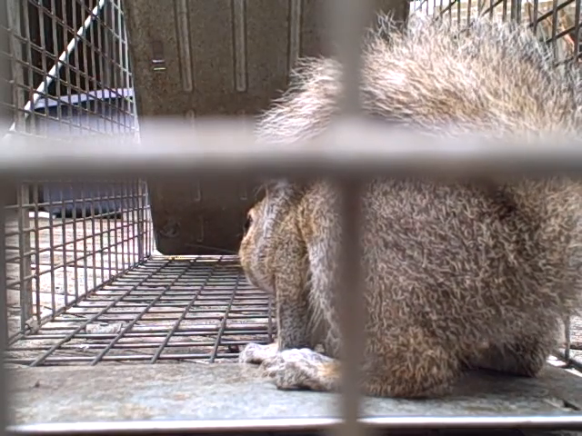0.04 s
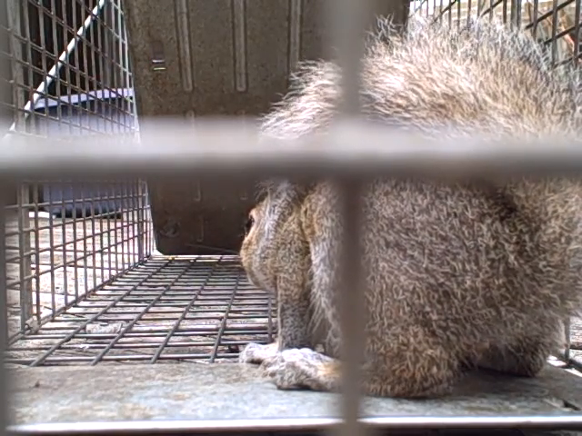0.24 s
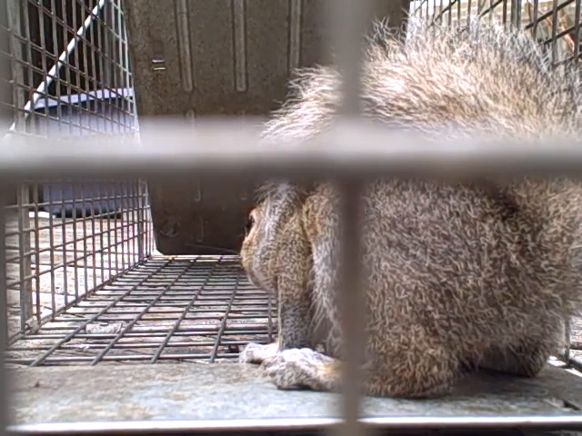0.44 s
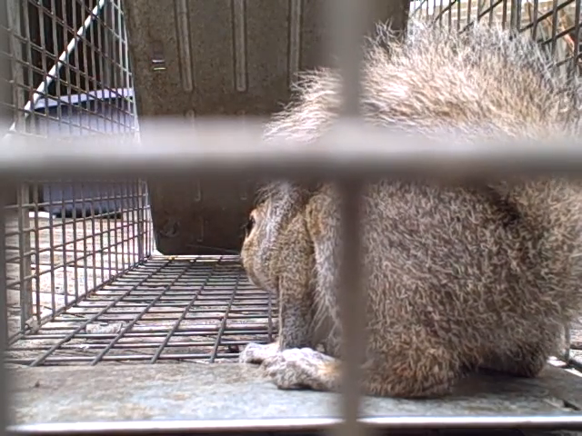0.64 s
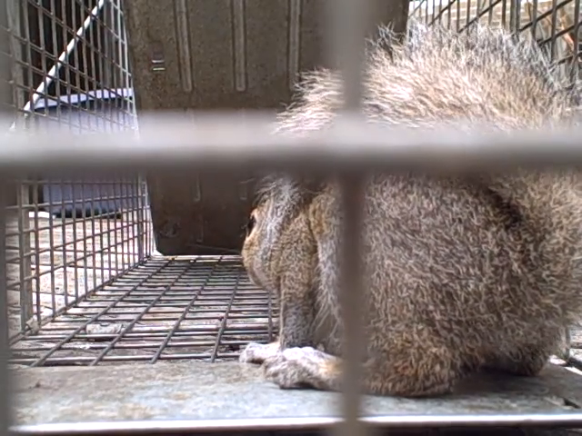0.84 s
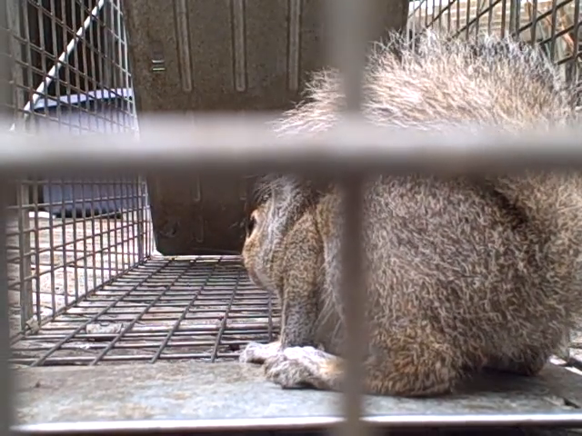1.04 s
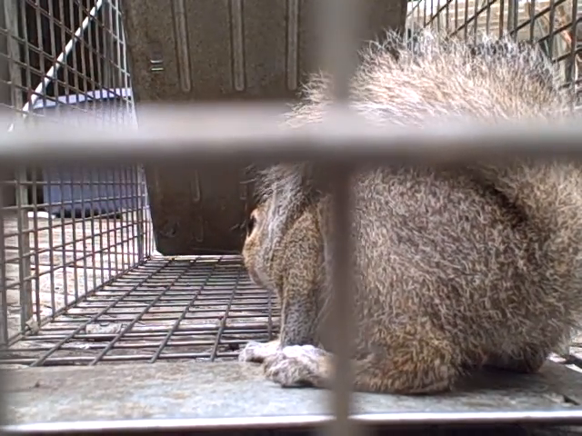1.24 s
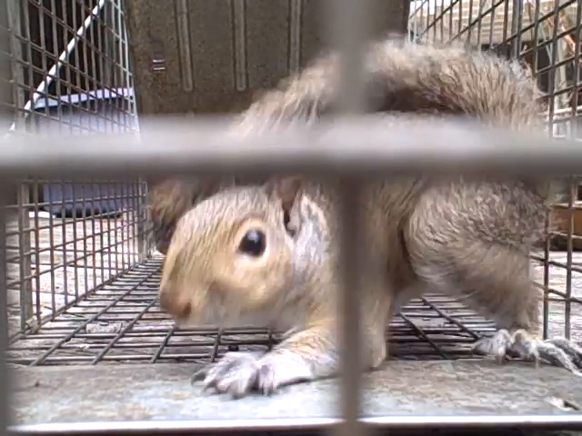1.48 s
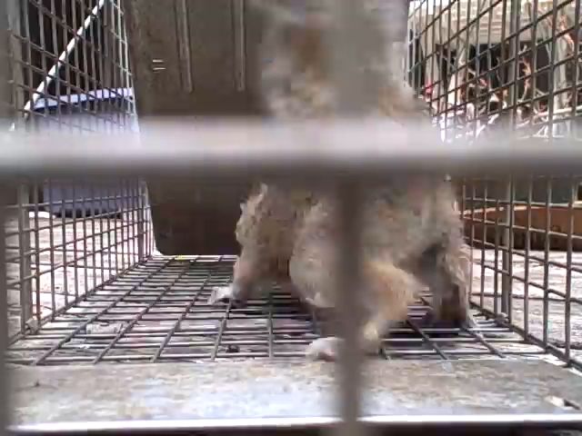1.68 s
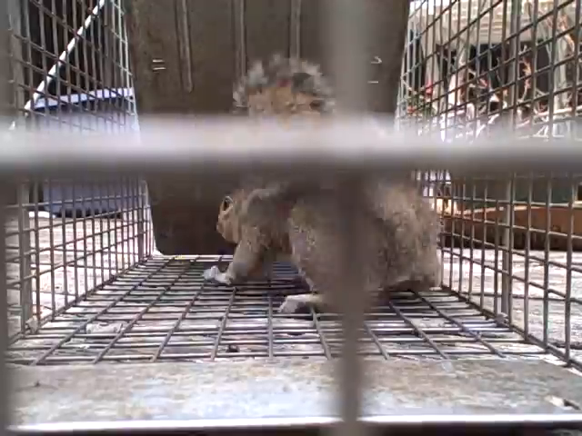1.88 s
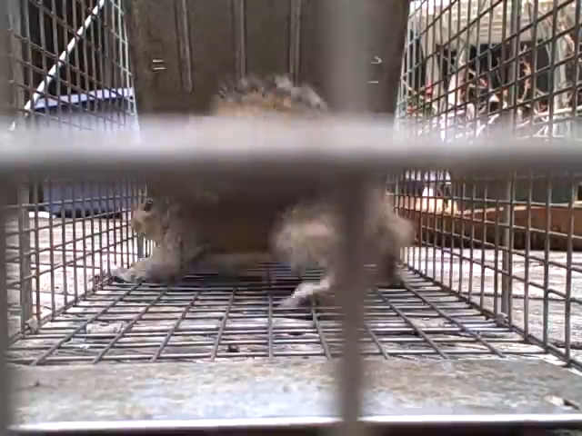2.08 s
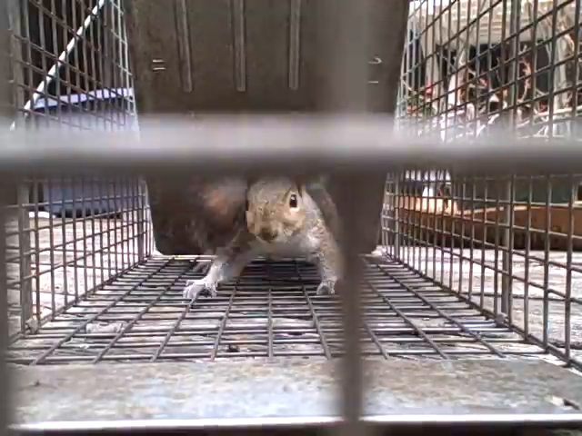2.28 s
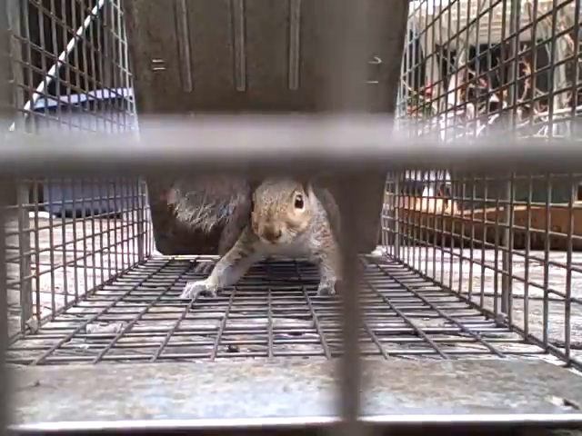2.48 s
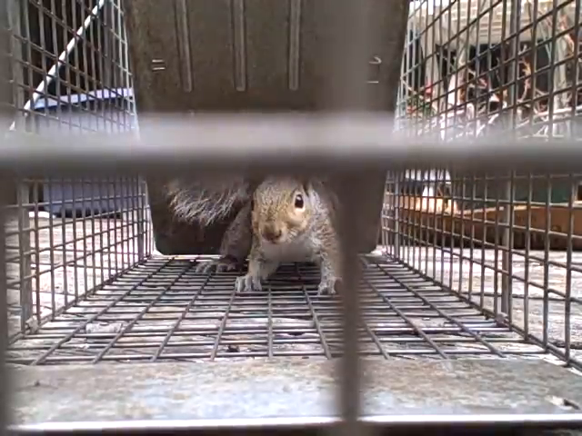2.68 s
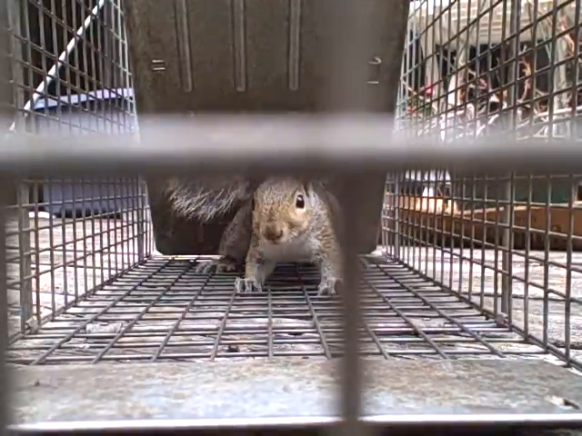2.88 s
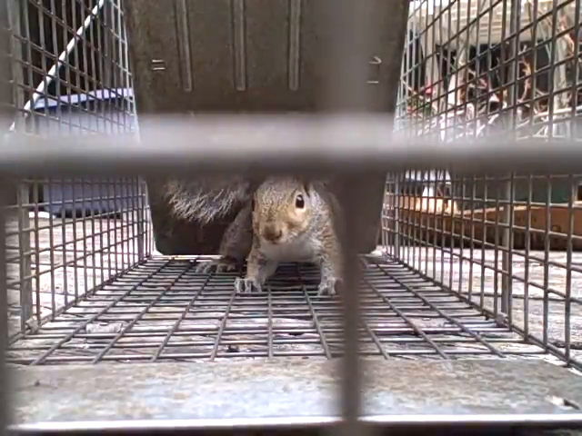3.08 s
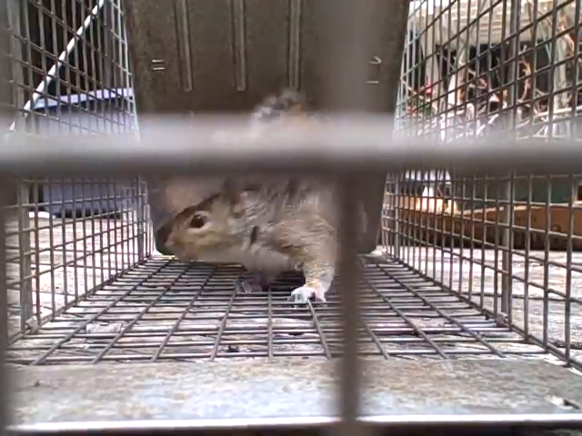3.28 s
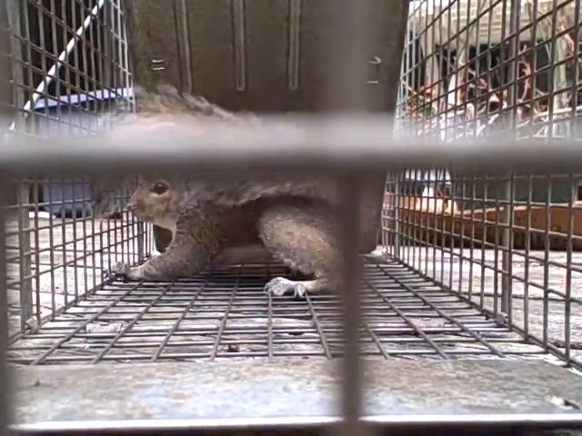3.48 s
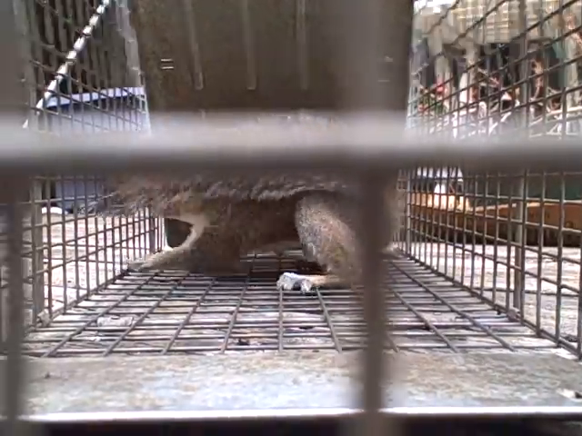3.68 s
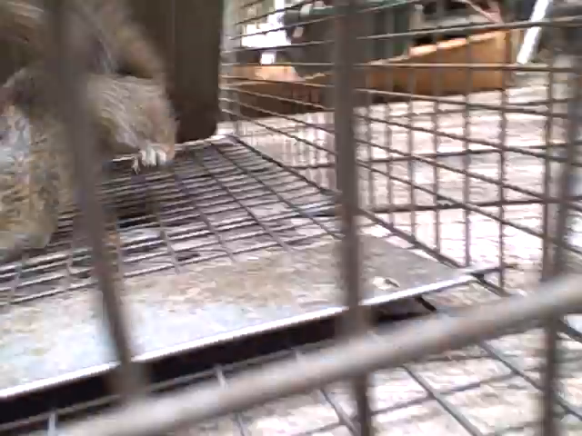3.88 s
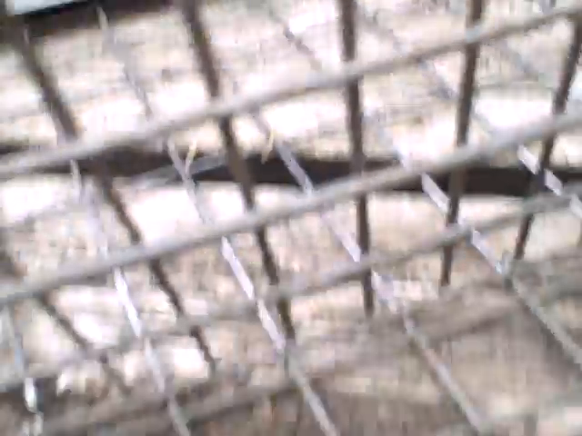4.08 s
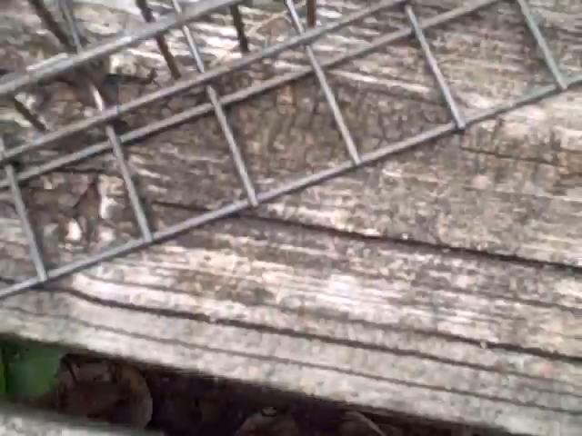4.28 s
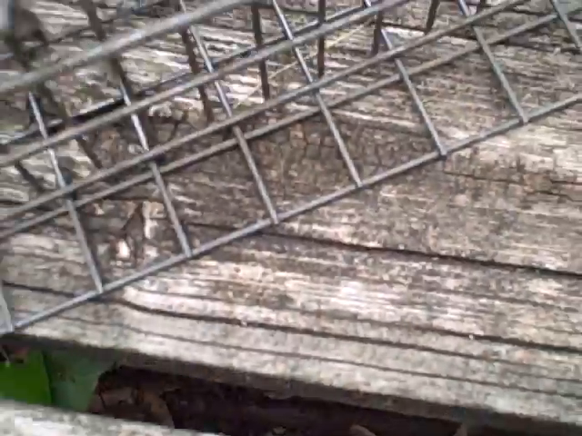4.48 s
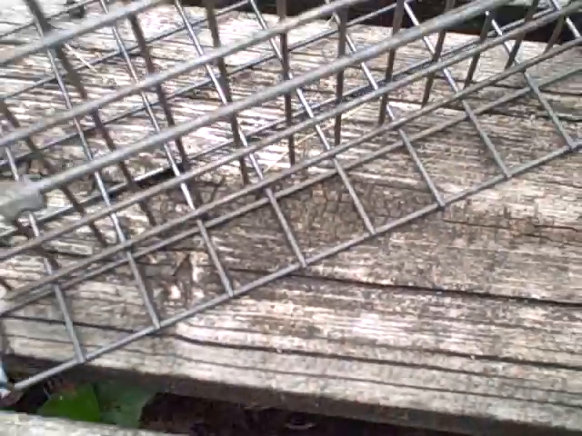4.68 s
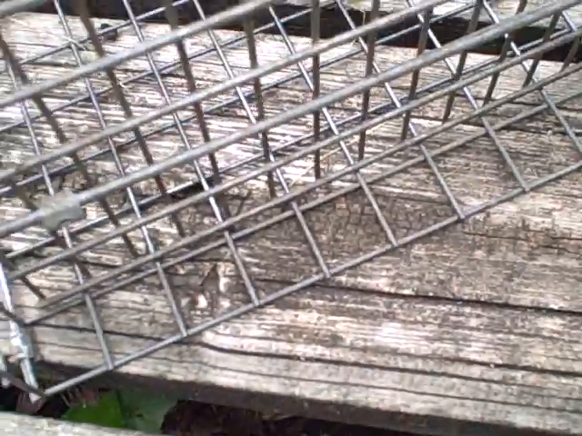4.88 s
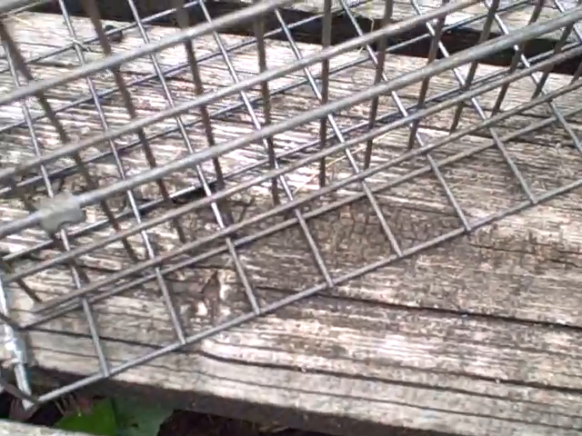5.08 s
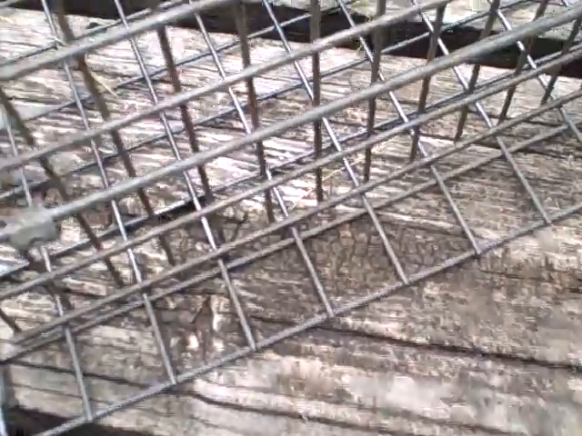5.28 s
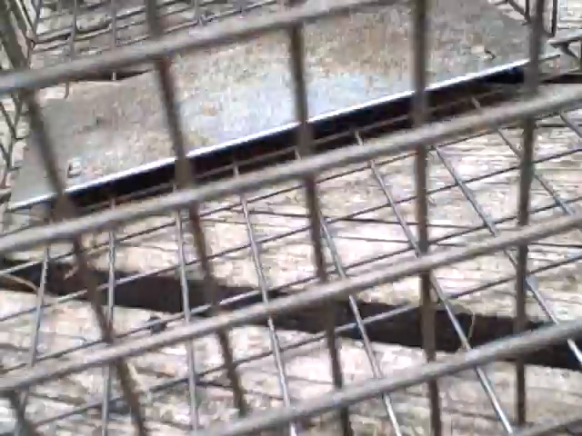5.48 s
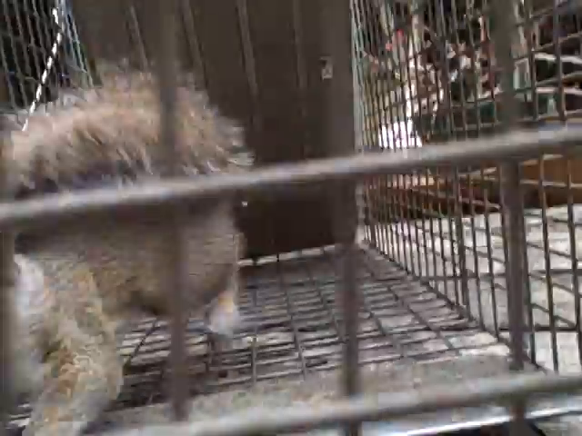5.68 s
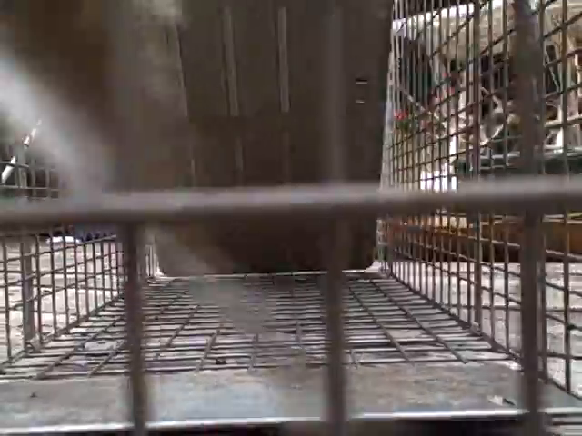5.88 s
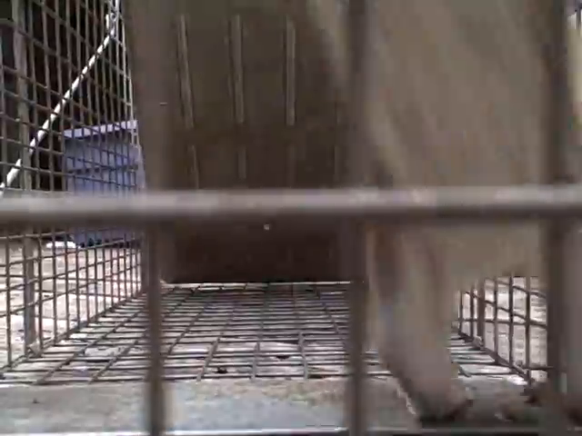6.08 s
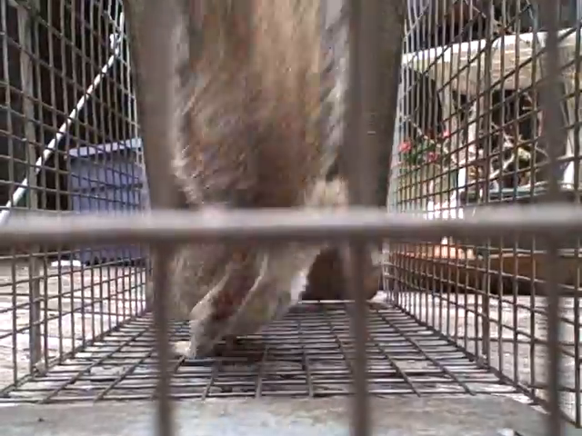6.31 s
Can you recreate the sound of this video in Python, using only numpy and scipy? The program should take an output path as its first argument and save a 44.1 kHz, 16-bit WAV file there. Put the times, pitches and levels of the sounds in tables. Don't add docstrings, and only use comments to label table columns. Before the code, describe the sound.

A squirrel scrambles in bursts inside a wire-mesh trap on wooden boards, claws rattling the metal, with a growl, a bark and a grunt.

```python
import sys
import numpy as np
from scipy import signal
from scipy.fft import rfft, irfft, next_fast_len
from scipy.io import wavfile
from scipy.ndimage import uniform_filter1d

SR = 44100
rng = np.random.default_rng(int(sys.argv[2]) if len(sys.argv) > 2 else 0)


def decibels_to_gain(level_db):
    exponent = np.asarray(level_db, float) / 20
    return 10 ** exponent


def file_out(sig):
    cols = np.atleast_2d(sig).T
    lim = np.clip(cols, -1, 1)
    pcm = np.round(lim * 32767).astype(np.int16)
    wavfile.write(sys.argv[1], SR, pcm)


N = 279770

# (frequency [Hz], density [dB per Hz])
AIR_SPECTRUM = [(15, -25), (28, 5), (45, 8), (64, 7), (102, 5), (200, -2.5), (270, -25), (354, -14.5),
                (489, -14), (988, -12), (1700, -19), (3720, -20), (9000, -27.5), (14800, -30), (16900, -27)]
AIR_DB = -57.5
# (time [s], length [s], start pitch [Hz], end pitch [Hz], level [dB])
BIRDS = [(-.03, .069, 3400, 3060, -62), (-.02, .085, 4350, 3700, -65), (-.02, .086, 3650, 3550, -61),
         (.03, .1, 3300, 3280, -67), (.02, .048, 2600, 2830, -65), (.093, .03, 1730, 1700, -64),
         (.335, .03, 7400, 7400, -74), (.375, .025, 7400, 7400, -75), (.45, .032, 6300, 6860, -77),
         (.522, .07, 3700, 3330, -75), (1.095, .045, 2600, 2500, -68), (1.6, .083, 3500, 3700, -70),
         (1.285, .03, 2900, 3600, -72), (1.31, .05, 3620, 3640, -70), (.87, .03, 1720, 1720, -68),
         (1.1, .05, 1250, 1200, -67), (.6, .12, 1800, 1780, -75), (.2, .15, 1620, 1600, -74),
         (2.87, .08, 1200, 1050, -67), (3.05, .05, 1700, 1680, -71)]
BIRD_FLUTTER_HZ = 140

# (time [s], peak [dB], pitch [Hz], t60 [s], wood [dB])
KNOCKS = [(.063, -48, 185, 0.0052, 17.5), (.243, -46, 824, 0.045, 12.5), (.843, -35, 110, 0.016, -9),
          (1.433, -31.5, 736, 0.022, -5), (1.469, -25, 150, 0.015, -6), (2.307, -38, 530, 0.17, -1),
          (3.347, -33, 340, 0.048, -22), (3.7705, -26, 253, 0.016, 5), (1.366, -30, 170, 0.042, -26),
          (4.605, -31.5, 285, 0.038, -5), (5.338, -45, 190, 0.066, 3.5), (5.578, -37.5, 330, 0.083, 4),
          (5.877, -14, 127, 0.053, -26), (5.9957, -2.5, 700, 0.0041, -4), (6.1618, -22, 2510, 0.02, -26),
          (6.2485, -23.5, 816, 0.025, -1)]
# (time [s], peak [dB], pitch [Hz], t60 [s], wood
# [dB])
THUDS = [(.765, -34, 112, 0.035, -8.5), (.785, -34.5, 200, 0.037, -3.5), (.924, -27, 108, 0.017, -19),
         (1.172, -50.5, 110, 0.029, 6.5), (1.342, -19.5, 172, 0.048, -16), (1.6, -40, 300, 0.032, 13),
         (2.006, -40, 91.5, 0.095, -21), (2.152, -32.5, 287, 0.079, 8), (2.75, -40.5, 186, 0.072, -16),
         (3.487, -20, 125, 0.032, -11), (3.7907, -8.5, 470, 0.0091, -7), (3.814, -24.5, 260, 0.019, -4),
         (4.3, -19.5, 313, 0.066, 0.5), (4.384, -22.5, 251.4, 0.12, 2.5), (5.661, -35, 143, 0.11, -2),
         (5.919, -4, 171, 0.015, -24), (6.166, -28, 150, 0.12, 0.5)]
# (time [s], peak [dB], pitch [Hz], t60 [s], wood [dB])
CAMERA_SNAP = [
    (3.7436, -31.5, 1230, 0.03, 11),
]
THUD_CRACK_DB, KNOCK_CRACK_DB, SNAP_CRACK_DB = -13.5, -10, 12
THUD_RISE_CYCLES = 0.22
# (frequency [Hz], level [dB], t60 [s])
CASE_MODES = [(640, 2.5, 0.019), (824, -2, 0.026), (1227, 3, 0.017), (1760, 4.5, 0.013),
              (2530, -5.5, 0.018), (3000, -6.5, 0.0089), (3600, -4.5, 0.01), (4660, -7.5, 0.011),
              (5030, -5, 0.0083), (6060, -7, .01), (7050, -5.5, 0.0072), (7900, -2, 0.0076),
              (9600, -11, 0.0074), (12100, -2, 0.0057)]
# (time [s], level [dB], softness as cut-off [Hz])
CASE_TAPS = [(.2425, -53, 1300), (1.3405, -34, 696), (1.4324, -45, 1500), (3.7439, -19, 14000),
             (3.7449, -29.5, 12000), (3.7702, -39, 2500), (3.7736, -42, 2000), (3.7905, -23.5, 1800),
             (3.792, -40, 6000), (3.817, -40, 1200), (6.166, -46, 1500), (6.2485, -28.5, 1200)]

# (time at full force [s], held [s], claw raking [dB], weight on frame [dB])
BOUTS = [(.8, 0.16, -70.5, -53), (1.36, 0.032, -93, -49.5), (1.43, 0.17, -68, -45.5),
         (1.585, 0.077, -37.5, -38.5), (1.68, 0.012, -49, -37.5), (1.74, 0.11, -71, -42),
         (1.848, 0.041, -55, -35), (1.93, 0.062, -61, -44), (2.167, 0.16, -46, -36),
         (2.38, 0.043, -54, -45), (2.48, 0.065, -53, -42), (2.75, 0.23, -75.5, -79), (3.36, 0.13, -66, -46),
         (3.486, 0.0036, -53, -34), (3.58, 0.14, -61, -61), (3.798, 0.007, -57.5, -54),
         (3.917, 0.068, -54, -41.5), (4.02, 0.16, -61, -57.5), (4.18, 0.095, -66, -53.5),
         (4.316, 0.098, -36, -30.5), (4.43, 0.06, -39, -35), (4.627, 0.02, -47.5, -39),
         (4.72, 0.18, -77, -52.5), (5.049, 0.081, -61.5, -62), (5.37, 0.037, -65, -51.5),
         (5.52, 0.15, -69.5, -52.5), (5.668, 0.0053, -50, -37), (5.76, 0.1, -41.5, -32.5),
         (5.9, 0.028, -27, -26.5), (5.971, 0.075, -31.5, -31), (6.16, .15, -38.5, -40.5)]
ATTACK_DB_PER_S, WIRES_SETTLE_DB_PER_S, FRAME_SETTLE_DB_PER_S = 397, 185, 185
AFTERSHAKE_DB, AFTERSHAKE_SLOWER = -15.5, 0.25
REST_RAKE_DB, REST_FRAME_DB = -83.5, -64
PLATE_FROM_RAKE, PLATE_FROM_FRAME, PLATE_DB = 0.54, 0.47, -2.5
RUMBLE_FROM_FRAME, RUMBLE_DB = 0.5, -27.5
# (time [s], held [s], rumble [dB])
HANDLING = [
    (3.75, 0.021, -34.5),
    (4.09, 0.041, -46),
    (5.08, 0.13, -55.5),
    (5.5, 0.11, -52),
    (6.07, 0.038, -41),
]
# (frequency [Hz], width [Hz], level [dB])
BOARD_MODES = [(150, 79, -1), (255, 74, 2), (369.4, 63, 2), (584, 140, -1.5), (653, 83, 1.5),
               (822, 175, -2), (952, 500, -6), (1480, 550, -17)]

# (time [s], level [dB], frequency
# [Hz], t60 [s])
CREAKS = [(.843, -53, 2400, .02), (1.6005, -26.5, 930, .012), (2.612, -52, 620, 0.027),
          (2.658, -62, 1800, .04), (2.912, -59, 1500, .03), (2.912, -57, 4200, .03),
          (3.005, -57, 1250, .03), (3.115, -66, 3900, .02), (3.208, -56, 980, 0.062),
          (3.26, -56, 800, 0.062), (5.9944, -20, 640, 0.0036), (5.62, -49, 730, 0.094),
          (4.55, -27, 10600, 0.11), (4.522, -33, 13400, .08), (4.4, -31, 6000, .08)]
# (time [s], level [dB], frequency [Hz], t60 [s])
PINGS = [(1.452, -54, 2580, .05), (1.466, -46, 3100, 0.055), (1.527, -42, 4760, .06),
         (1.555, -49, 2530, 0.11), (1.575, -35, 3570, 0.16), (1.6, -46, 2890, .08),
         (1.672, -28, 6680, 0.093), (1.845, -52, 2600, .08), (1.981, -53, 2060, 0.068),
         (2.157, -40, 2300, .1), (2.16, -38, 4800, .08), (2.194, -36, 2590, 0.079), (2.196, -36, 3740, .06),
         (2.303, -33.5, 2950, 0.037), (2.453, -52, 4300, .05), (2.484, -52, 4070, .05),
         (3.478, -40, 2410, 0.04), (3.9, -47, 3720, 0.074), (4.145, -47, 2750, 0.11),
         (4.28, -36, 2660, 0.098), (4.34, -18, 13680, 0.15), (4.335, -26, 8450, .15),
         (4.418, -25, 5070, 0.057), (4.441, -37, 1890, .1), (4.518, -43, 1830, 0.4),
         (4.572, -36, 5230, 0.11), (4.573, -35, 4620, 0.089), (4.573, -23, 11800, 0.073),
         (4.575, -44, 2990, .1), (4.62, -42, 2620, 0.054), (4.801, -51, 3730, 0.22),
         (4.835, -48, 3000, .05), (5.339, -46, 2000, 0.074), (5.567, -44.5, 3860, 0.066),
         (5.657, -56, 2830, .08), (5.742, -37, 2910, 0.085), (5.815, -36, 3690, .08),
         (5.815, -31, 6570, 0.2), (5.887, -15, 4830, 0.1), (5.92, -27, 14400, .15), (5.98, -30, 4700, 0.24),
         (6.04, -31, 10700, .12), (3.328, -50, 9050, 0.12), (3.339, -24, 9280, 0.099),
         (3.339, -33, 11800, 0.15), (3.34, -43, 14100, .35), (3.46, -29, 9000, 0.18),
         (3.46, -40, 14200, 0.39), (3.465, -46, 6540, 0.29), (2.226, -31, 14100, .3)]
CLUSTER_SPREAD = .018
# (time [s], peak [dB])
TICKS = [(1.507, -28), (1.528, -12.5), (1.553, -14), (2.9916, -57), (3.2394, -54), (3.2694, -55),
         (3.331, -42), (3.7254, -42), (3.8274, -44), (4.33, -15), (4.418, -2.5), (4.5736, -9), (6.155, -20),
         (6.2365, -22), (5.74, -22), (5.8138, -19), (5.875, 0), (5.882, 8), (6.213, -20)]

# (time [s], peak [dB], shiver t60 [s], struck wire [Hz], short over long wires [dB])
FLOOR_STRIKES = [(.985, -47, 0.33, 5900, -4), (1.385, -40, 1, 14500, 3), (1.7539, -34, 0.66, 9200, -9),
                 (1.8487, -35, 0.92, 9100, -9), (2.2256, -16, 0.2, 9160, 9), (3.3395, -22, 0.28, 8900, 9),
                 (3.4588, -19.5, 0.31, 13600, 4), (4.221, -28.5, 0.16, 6740, 10),
                 (4.311, -17, .11, 8900, 0), (4.327, -6, 0.093, 12900, 5), (4.416, -9.5, 0.23, 14700, 7),
                 (4.5722, -12.5, 0.072, 6520, 11), (6.04, -20, .2, 11940, 5),
                 (5.32, -32.5, 0.15, 6550, -13), (5.566, -26, 0.43, 9200, 2), (5.813, -10.5, 0.17, 9100, 1),
                 (5.862, -14.5, .06, 10600, -11), (5.8725, -1, 0.092, 8900, 16),
                 (5.8795, -0.5, 0.21, 13260, 2)]
# (time [s], peak [dB], shiver t60 [s], struck wire [Hz], short over long wires [dB])
PLATE_STRIKES = [(1.4659, -25, 0.18, 9400, 12), (1.5529, -19, 0.38, 9140, 0), (1.653, -20, 0.29, 14900, -3),
                 (2.158, -19, 0.45, 6920, 1), (2.2975, -22.5, 0.25, 9230, -3),
                 (3.4247, -34, 0.31, 8850, 11), (3.916, -32, 0.25, 6300, -13),
                 (3.986, -34.5, 0.24, 6770, 8), (4.142, -36.5, 0.17, 9200, -4),
                 (4.2863, -19.5, 0.18, 6460, 5), (4.6628, -34, 0.44, 6670, 1), (4.799, -31, 0.35, 9200, 1),
                 (4.987, -29, 0.14, 10500, -3), (5, -26.5, 0.24, 9950, 3), (5.3323, -31.5, 0.44, 6680, 9),
                 (5.6576, -25.5, 0.25, 9140, 5), (5.7247, -27, 0.17, 6700, 17), (5.74, -16, 0.26, 6300, 0),
                 (6.154, -22, 0.23, 15300, 13), (6.1752, -16, 0.083, 6700, 4)]
# (time [s], peak [dB], shiver t60 [s], struck wire [Hz], short over long wires [dB])
WALL_STRIKES = [(1.507, -23, 0.096, 9030, -6), (1.526, -17.5, 0.15, 13300, 0),
                (1.6741, -11.5, 0.055, 8910, -1), (2.0735, -34, 0.26, 9500, 7),
                (2.1005, -24, 0.19, 9000, 6), (2.1176, -22.5, 0.42, 8920, 4), (3.7425, -41, 0.31, 7900, 15),
                (3.859, -28.5, 0.32, 9000, 8), (4.236, -31, .16, 9900, 8), (4.3435, -12.5, 0.27, 12800, 6),
                (4.7337, -25.5, 0.051, 9860, 0), (5.556, -35, 0.12, 9000, 4),
                (5.6052, -29.5, 0.57, 8920, 9), (6.2133, -14, 0.066, 9150, 8),
                (6.2353, -17.5, 0.14, 14100, 5)]
WALL_TO_PLATE_DB, FLOOR_TO_PLATE_DB, PLATE_TO_PLATE_DB = -18.5, -12.5, -5.5
# (frequency [Hz], spread [Hz], level [dB])
WIRES = [(6250, 110, -15), (6040, 56, 2), (6570, 29, 1.5), (6960, 150, 4.5), (7320, 61, 6),
         (7900, 120, -20), (8478, 50, -10), (8920, 40, 3.5), (9210, 55, 1.5), (10400, 64, -9),
         (10640, 52, -5), (11800, 200, -11), (11200, 76, -10), (12440, 200, 0), (12600, 90, -6),
         (12940, 190, -2), (13680, 80, -1), (14200, 220, 6), (14700, 100, -2.5), (15300, 270, 0)]
BENDING_HZ = [6580, 9150, 11850, 14150]
# (frequency [Hz], density [dB per Hz])
MESH_SPECTRUM = [(2500, 0), (3500, -4.5), (4800, -3), (5600, -1.5), (6600, 5), (7800, 2.5), (9100, 3.5),
                 (9800, 3.5), (10600, -1.5), (11900, -2.5), (12900, -10), (14200, -1.5), (15300, -8.5),
                 (16900, -17)]
RATTLE_DB = 0.5
# (frequency [Hz], density [dB per Hz])
PLATE_SPECTRUM = [(710, -0.5), (1200, 0), (1300, -11.5), (1460, -2.5), (2180, -2.5), (2550, -2.5),
                  (5000, -6), (6500, -9), (11000, -120)]
SHARDS_PER_S, SHARDS_DB, SHARD_CYCLES = 800, -5, 45.0

# (time [s], pitch [Hz], level [dB])
GROWL = [
    (2.344, 242, -48),
    (2.35, 253, -46),
    (2.398, 222.6, -45),
    (2.534, 218.4, -46.5),
    (2.59, 229.6, -62),
]
# (time [s], pitch [Hz], level [dB])
BARK = [
    (4.986, 615.5, -55),
    (4.988, 600.4, -32),
    (4.994, 570, -34),
    (5.001, 530, -29),
    (5.01, 594, -29),
    (5.022, 519, -33),
    (5.034, 477, -35),
    (5.05, 408, -47),
    (5.07, 392, -53),
]
# (time [s], pitch [Hz], level [dB])
GRUNT = [
    (5.775, 250, -36),
    (5.805, 260.6, -32.5),
    (5.838, 255, -31),
    (5.855, 253, -36),
]
# (frequency [Hz], width [Hz], level [dB])
GROWL_THROAT = [(230, 165, 4), (440, 220, 3.5), (913, 270, 3.5), (2600, 1300, -15), (4300, 2000, -9)]
# (frequency [Hz], width [Hz], level [dB])
BARK_THROAT = [(530, 410, 1), (1190, 290, 2), (1430, 300, 0.5), (2660, 1300, -8), (3500, 390, -3.5),
               (4920, 250, -4.5)]


def rms_one(x):
    return x / np.sqrt(np.mean(x ** 2) + 1e-20)


def place(out, s, sound):
    at = round(s * SR)
    out[at:at + len(sound)] += sound


def in_time(rows):
    s, *columns = np.transpose(rows)
    return [np.interp(np.arange(N) / SR, s, c) for c in columns]


def coloured(x, spectrum):
    hz, level_db = np.transpose(spectrum)
    size = next_fast_len(N)
    log_hz = np.log(np.maximum(np.fft.rfftfreq(size, 1 / SR), 1))
    gain = decibels_to_gain(np.interp(log_hz, np.log(hz), level_db, left=-90, right=-90))
    return rms_one(irfft(rfft(x, size) * gain, size)[:N])


def bandpass(x, low_hz, high_hz):
    return signal.sosfilt(signal.butter(2, [low_hz, high_hz], "band", fs=SR, output="sos"), x)


def drift(rate_hz):
    r = np.exp(-128 * np.pi * rate_hz / SR)
    slow = signal.lfilter([1], [1, -2 * r, r * r], rng.standard_normal(N // 64 + 1002))[1000:]
    return np.interp(np.arange(N) / 64, np.arange(len(slow)), rms_one(slow))


def resonate(x, hz, width_hz):
    r = np.exp(-np.pi * width_hz / SR)
    zeros = np.array([1, 0, -1]) * (1 - r * r) / 2
    poles = [1, -2 * r * np.cos(2 * np.pi * hz / SR), r * r]
    return signal.lfilter(zeros, poles, x + 1e-18)


def body(x, modes):
    return sum((-1) ** k * decibels_to_gain(level_db) * resonate(x, hz, width_hz)
               for k, (hz, width_hz, level_db) in enumerate(modes))


def contacts(per_s, spread_db):
    sizes = decibels_to_gain(spread_db * np.minimum(rng.exponential(1, N), 4)) * rng.choice([-1, 1], N)
    return rms_one(sizes * (rng.random(N) < per_s / SR))


def outdoor_air():
    gusts = decibels_to_gain(drift(2))
    air = decibels_to_gain(AIR_DB - 1.5) * gusts * coloured(rng.standard_normal(N), AIR_SPECTRUM)
    traffic = bandpass(air, 250, 5000)
    return air + traffic * (decibels_to_gain(1.5 * drift(4) - 1.0) - 1)


def birds():
    out = np.zeros(N + SR)
    for s, length_s, from_hz, to_hz, level_db in BIRDS:
        size = round(length_s * SR)
        pitch_hz = np.linspace(from_hz, to_hz, size) * (1 + 0.0051 * drift(200)[:size])
        flutter = .6 + drift(BIRD_FLUTTER_HZ)[:size]
        whistle = np.sin(2 * np.pi * np.cumsum(pitch_hz) / SR)
        place(out, s + 1, decibels_to_gain(level_db + 4) * np.sqrt(np.hanning(size)) * flutter * whistle)
    return out[SR:]


def blows():
    kinds = [(THUDS, THUD_CRACK_DB), (KNOCKS, KNOCK_CRACK_DB), (CAMERA_SNAP, SNAP_CRACK_DB)]
    return sorted((*row, crack_db) for rows, crack_db in kinds for row in rows)


def knocks():
    out = np.zeros(N + SR)
    t = np.arange(SR // 8) / SR
    for s, peak_db, hz, t60_s, wood_db, crack_db in blows():
        noise = rng.standard_normal(len(t))
        fade_db = -60 * t / max(t60_s, .005)
        rise = 1 - np.exp(-t * hz / THUD_RISE_CYCLES)
        thud = np.sin(2 * np.pi * hz * t) * decibels_to_gain(fade_db + 1.5) * rise
        tock = rms_one(resonate(resonate(noise, 600, 790), 600, 790))
        wood = tock * decibels_to_gain(wood_db - 9 + 0.52 * fade_db)
        crack = rms_one(resonate(noise[::-1], 2200, 5100)) * decibels_to_gain(crack_db - 18.5 + 4.5 * fade_db)
        place(out, s, decibels_to_gain(peak_db) * (thud + wood + crack))
    return out[:N]


def camera():
    out = np.zeros(N + SR)
    t = np.arange(SR // 10) / SR
    ring = sum((-1) ** k * decibels_to_gain(level_db - 60 * t / t60_s) * np.sin(2 * np.pi * hz * t)
               for k, (hz, level_db, t60_s) in enumerate(CASE_MODES))
    for s, level_db, cut_hz in CASE_TAPS:
        place(out, s, decibels_to_gain(level_db) * signal.lfilter(*signal.butter(2, cut_hz, fs=SR), ring))
    return out[:N]


def effort(rows, levels_db, settle_db_per_s, rest_db):
    t = np.arange(0, N + 64, 64) / SR
    s, held_s = np.array(rows)[:, :1], np.array(rows)[:, 1:2]
    attack_db = ATTACK_DB_PER_S * np.maximum(s - t, 0)
    settled_db = settle_db_per_s * np.maximum(t - s - held_s, 0)
    settled_db = np.minimum(settled_db, AFTERSHAKE_SLOWER * settled_db - AFTERSHAKE_DB)
    power = np.sum(decibels_to_gain(levels_db[:, None] - attack_db - settled_db) ** 2, axis=0)
    return 10 * np.log10(np.interp(np.arange(N) / SR, t, power) + decibels_to_gain(rest_db) ** 2)


def scramble():
    claws_db, weight_db = np.array(BOUTS)[:, 2:].T
    rake_db = effort(BOUTS, claws_db, WIRES_SETTLE_DB_PER_S, REST_RAKE_DB)
    frame_db = effort(BOUTS, weight_db, FRAME_SETTLE_DB_PER_S, REST_FRAME_DB)
    plate_db = PLATE_DB + PLATE_FROM_RAKE * rake_db + PLATE_FROM_FRAME * frame_db
    shaken_db = RUMBLE_DB + RUMBLE_FROM_FRAME * frame_db
    rumble_db = effort(HANDLING, np.array(HANDLING)[:, 2], FRAME_SETTLE_DB_PER_S, shaken_db)
    return rake_db, plate_db, frame_db, rumble_db


def frame(frame_db, rumble_db):
    push = contacts(400, 1.83) + 0.79 * rng.standard_normal(N)
    drumming = rms_one(body(push, BOARD_MODES)) * decibels_to_gain(frame_db - 2.0 + 2.0 * drift(29))
    rumble = rms_one(bandpass(rng.standard_normal(N), 38, 160)) * decibels_to_gain(rumble_db - 1.0)
    return drumming + rumble


def mode_clusters(rows):
    out = np.zeros(N + SR)
    t = np.arange(SR // 3) / SR
    for s, level_db, hz, t60_s in rows:
        cluster = np.sin(2 * np.pi * hz * t)
        for apart, size in rng.uniform(-1, 1, (3, 2)):
            near_hz = hz * (1 + CLUSTER_SPREAD * apart)
            cluster += 0.7 * decibels_to_gain(5 * size) * np.sin(2 * np.pi * near_hz * t)
        rise = 1 - np.exp(-t / (min(t60_s, .1) * .02))
        place(out, s, decibels_to_gain(level_db - 4.5 - 60 * t / max(t60_s, .004)) * rise * cluster)
    return out[:N]


def creaks():
    return mode_clusters(CREAKS)


def strikes():
    kinds = [(WALL_STRIKES, WALL_TO_PLATE_DB), (FLOOR_STRIKES, FLOOR_TO_PLATE_DB),
             (PLATE_STRIKES, PLATE_TO_PLATE_DB)]
    return sorted((s, peak_db, share_db, *rest) for rows, share_db in kinds for s, peak_db, *rest in rows)


def shiver(rise_s, column_db):
    power = np.zeros(N)
    for (s, peak_db, _, t60_s, _, _), extra_db in zip(strikes(), column_db):
        t = np.arange(min(N - round(s * SR), SR // 4)) / SR
        fade = decibels_to_gain(-60 * t / max(t60_s, .01)) + 0.5 * decibels_to_gain(-60 * t / 0.0072)
        place(power, s, (decibels_to_gain(peak_db + extra_db) * fade * (1 - np.exp(-t / rise_s))) ** 2)
    return np.sqrt(power)


def struck_wires():
    out = np.zeros(N + SR)
    t = np.arange(SR // 5) / SR
    for s, peak_db, _, t60_s, wire_hz, _ in strikes():
        fade = decibels_to_gain(peak_db - 60 * t / (0.56 * max(t60_s, .01)))
        push = rng.standard_normal(len(t)) * fade * (1 - np.exp(-t / 0.00043))
        ring = resonate(push, wire_hz, 87)
        for hz in BENDING_HZ:
            share = decibels_to_gain(rng.normal(-10, 5))
            ring += share * resonate(push, hz * (1 + rng.standard_normal() / 40), 63)
        place(out, s, decibels_to_gain(5) * ring)
    return out[:N]


def mesh(rake_db):
    tilt_db = np.array(strikes())[:, 5]
    rake = decibels_to_gain(rake_db + 2.5 * drift(8.1))
    long_wires = np.hypot(shiver(0.0015, -13.5 - tilt_db / 2), rake)
    short_wires = np.hypot(shiver(0.00088, -9.5 + tilt_db / 2), rake)
    grit = coloured(contacts(5000, 2.5) + rng.standard_normal(N), MESH_SPECTRUM)
    low = signal.sosfiltfilt(signal.butter(2, 10000, fs=SR, output="sos"), grit)
    chatter = low * long_wires + (grit - low) * short_wires
    chatter = chatter * decibels_to_gain(RATTLE_DB * drift(90))
    ringing, white = np.zeros(N), rng.standard_normal(N)
    for hz, spread_hz, level_db in WIRES:
        drive = long_wires if hz < 1e4 else short_wires
        touched = decibels_to_gain(9.4 * np.minimum(drift(12), 1))
        push = white * drive * touched
        for off in (-.7, .2, .8):
            ringing += decibels_to_gain(level_db) * resonate(push, hz + off * spread_hz, 45)
    return decibels_to_gain(-3.0) * chatter + decibels_to_gain(-5.5) * ringing + struck_wires()


def tread_plate(plate_db):
    struck = shiver(0.0015, np.array(strikes())[:, 2] - 11)
    drive = np.hypot(struck, decibels_to_gain(plate_db + 1.5 * drift(25)))
    clatter = contacts(2500, 3.0) + 1.1 * rng.standard_normal(N)
    return coloured(clatter, PLATE_SPECTRUM) * drive


def shards(plate_db):
    sizes, dealt = contacts(SHARDS_PER_S, 3.2), rng.integers(0, 12, N)
    rings = sum(resonate(sizes * (dealt == k), hz, hz / SHARD_CYCLES)
                for k, hz in enumerate(np.geomspace(700, 6600, 12)))
    return rms_one(rings) * decibels_to_gain(plate_db + SHARDS_DB)


def pings():
    return mode_clusters(PINGS)


def claw_ticks():
    out = np.zeros(N + SR)
    t = np.arange(SR // 3) / SR
    for s, peak_db in TICKS:
        bright = rms_one(resonate(rng.standard_normal(len(t)), 12800, 8200))
        place(out, s, decibels_to_gain(peak_db - 4.0 - 60 * t / 0.0083) * bright)
    return out[:N]


def voice(rows, throat, jitter, rough, throb_hz, throb, chest_db):
    pitch_hz, level_db = in_time(rows)
    cycles = np.cumsum(pitch_hz * (1 + jitter * drift(60))) / SR
    breath = rough * 0.28 * rng.standard_normal(N) * (cycles % 1 < .4)
    pulses = np.diff(np.floor(cycles), prepend=0) + breath
    t = np.arange(N) / SR
    sounding = uniform_filter1d(1. * ((t > rows[0][0]) & (t < rows[-1][0])), size=100)
    beat = np.minimum(1 - throb * np.cos(2 * np.pi * throb_hz * (t - rows[0][0])), 1.2)
    chest = decibels_to_gain(chest_db) * np.sin(2 * np.pi * cycles)
    return (rms_one(body(body(pulses, throat), throat)) + chest) * decibels_to_gain(level_db) * sounding * beat


def growl():
    return decibels_to_gain(5.5) * voice(GROWL, GROWL_THROAT, jitter=0.021, rough=0.42,
                            throb_hz=30.0, throb=0.8, chest_db=-18.0)


def bark():
    return voice(BARK, BARK_THROAT, jitter=0.052, rough=0.65, throb_hz=50, throb=0.08, chest_db=0.5)


def grunt():
    return voice(GRUNT, GROWL_THROAT, jitter=0.024, rough=0.63, throb_hz=30.2, throb=0.13, chest_db=-4.0)


def scene():
    rake_db, plate_db, frame_db, rumble_db = scramble()
    surroundings = outdoor_air() + birds()
    blunt = knocks() + camera() + frame(frame_db, rumble_db) + creaks()
    metal = mesh(rake_db) + tread_plate(plate_db) + shards(plate_db) + pings() + claw_ticks()
    animal = growl() + bark() + grunt()
    return (surroundings + blunt + metal + animal)[None]


def top_cut(x):
    return signal.sosfilt(signal.butter(12, 16960, fs=SR, output="sos"), x)


def record(dry):
    rounded = .84 * np.tanh(dry / .84)
    low_pass = signal.ellip(8, 1, 26, 15750, fs=SR, output="sos")
    mix = signal.sosfilt(low_pass, rounded)
    return top_cut(mix)


dry = scene()
out = record(dry)
file_out(out)
```